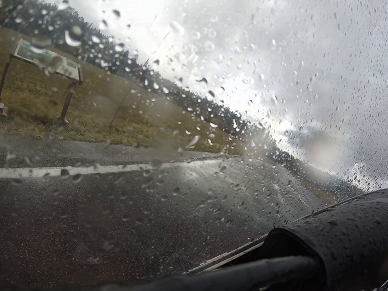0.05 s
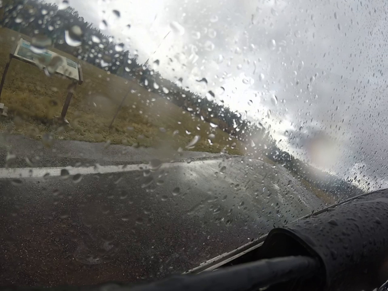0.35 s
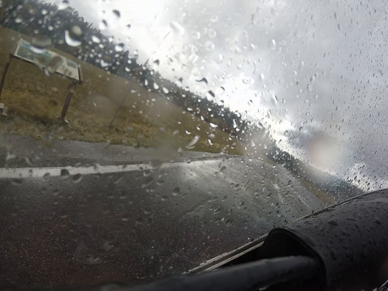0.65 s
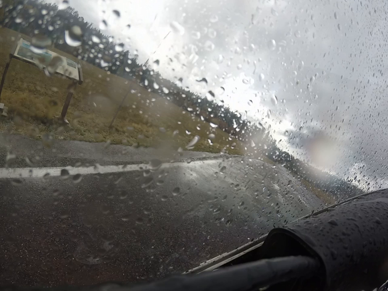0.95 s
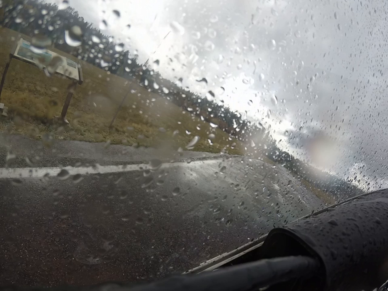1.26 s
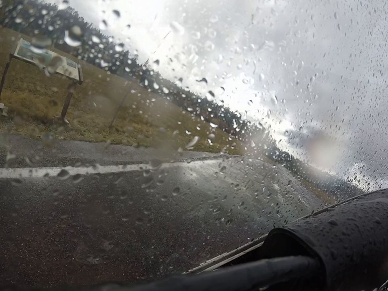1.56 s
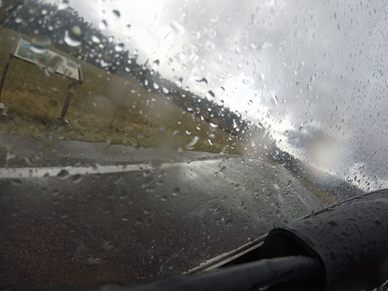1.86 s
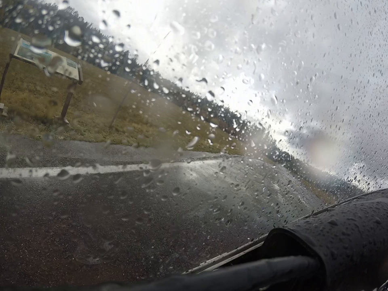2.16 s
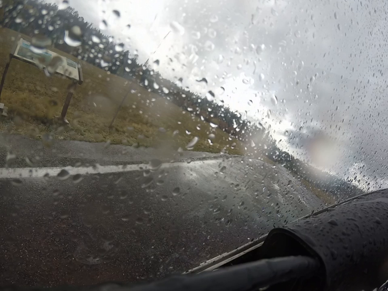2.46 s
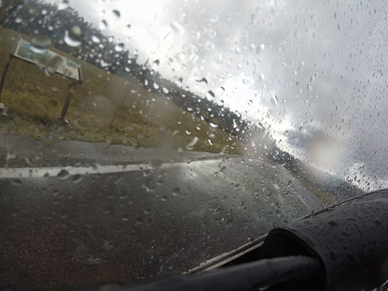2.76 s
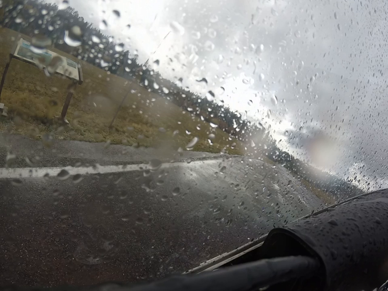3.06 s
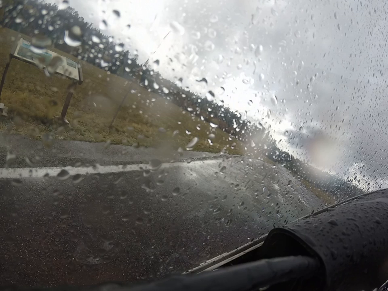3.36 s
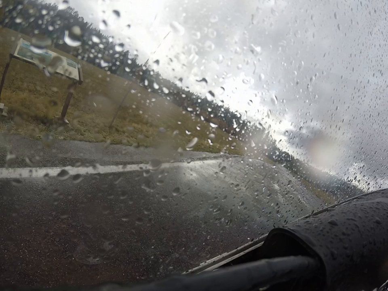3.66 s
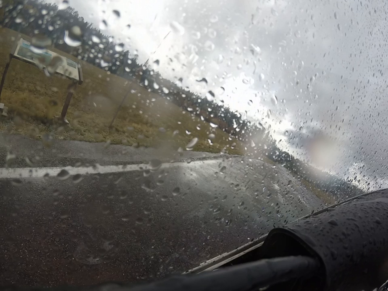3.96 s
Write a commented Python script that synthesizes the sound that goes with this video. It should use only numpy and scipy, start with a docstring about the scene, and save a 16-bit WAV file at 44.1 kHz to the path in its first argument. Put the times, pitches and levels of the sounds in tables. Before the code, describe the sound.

Raindrops and sleet tick unevenly on a parked car's windscreen, close to a microphone inside. One heavy drop thuds, then a pellet pings on thin metal. Faint drizzle, low wind and distant rain hiss continue underneath.

```python
"""Raindrops and sleet pellets tick on a parked car's windscreen, close to one microphone in the cabin.
Each hit rings the same short modes of glass and trim, in a balance set by where and how hard it lands,
and bursts in a tiny splash. One heavy drop thuds in a panel; one hard pellet pings on thin metal.
Fine drizzle patters underneath. Further off are low wind and the hiss of distant rain,
with a faint hum and a thin sizzle passing midway."""
import sys
import numpy as np
from scipy import signal
from scipy.fft import rfft, irfft
from scipy.io import wavfile
from scipy.ndimage import uniform_filter1d

SR = 44100
rng = np.random.default_rng(int(sys.argv[2]) if len(sys.argv) > 2 else 0)


def wrap_up_sound(samples):
    """Save the sound to the file named by the first command line argument, as 16-bit audio."""
    columns = np.atleast_2d(samples).T
    # keep every value between -1 and 1, then stretch to whole-number steps
    tamed = np.clip(columns, -1, 1)
    steps = np.round(tamed * 32767).astype(np.int16)
    wavfile.write(sys.argv[1], SR, steps)


N = 176400
TICK_SAMPLES = 2048
TICK_HZ = np.arange(TICK_SAMPLES // 2 + 1) * SR / TICK_SAMPLES
SCREEN_LOW_HZ, SCREEN_TOP_HZ = 737, 12000  # the stiff screen radiates between these


def undb(db):
    """Decibels to gain."""
    return 10 ** (np.asarray(db) / 20)


def clock(seconds):
    """Sample times of a short sound."""
    return np.arange(int(seconds * SR)) / SR


def fade(t, t60):
    """Exponential decay, 60 dB down after t60 seconds."""
    return np.exp(-np.log(1000) * t / max(t60, 1e-4))


def unit(x):
    """Scale to an energy of one."""
    return x / np.sqrt(np.sum(x ** 2) + 1e-30)


def filt(x, hz, kind, order=2):
    """Causal Butterworth filter."""
    return signal.sosfilt(signal.butter(order, hz, kind, fs=SR, output="sos"), x)


def drift(rate_hz):
    """Smooth random drift with a spread of one."""
    step = int(SR / rate_hz)
    curve = uniform_filter1d(np.repeat(rng.standard_normal(N // step + 1), step), step)[:N]
    return curve / curve.std()


def add(out, start_s, x):
    """Mix a sound in at a time."""
    i = int(start_s * SR)
    out[i:i + len(x)] += x[:max(N - i, 0)]


def ring(modes, t):
    """Decaying sines struck together."""
    return sum(undb(db) * np.sin(2 * np.pi * hz * t) * fade(t, t60) for hz, db, t60 in modes)


# Spectrum of the distant weather, from inside the car: frequency_hz, relative_db
WEATHER_SPECTRUM = [(12, -26), (20, -3), (53, 0.5), (107, 0), (337, -4.5), (434, -7), (780, -9.5),
                    (1190, -10), (1330, -15), (1610, -11.5), (2530, -15.5), (10200, -30), (13500, -35),
                    (16000, -41)]


def wind_and_far_rain(level_db=-61.5, flicker_db=0.9, steady_hz=2000):
    """Low rumble and far hiss; each octave flickers on its own, less so above steady_hz."""
    hz = np.maximum(np.arange(N // 2 + 1) * SR / N, 1)
    point_hz, point_db = np.array(WEATHER_SPECTRUM).T
    spectrum = rfft(rng.standard_normal(N)) * undb(np.interp(np.log(hz), np.log(point_hz), point_db))
    octave = np.maximum(np.log2(hz).astype(int), 5)
    out = np.zeros(N)
    for k in np.unique(octave):
        depth_db = flicker_db / np.hypot(1, 2. ** k / steady_hz)
        out += irfft(spectrum * (octave == k), N) * undb(depth_db * drift(rate_hz=23.01))
    return out / out.std() * undb(level_db)


# Bounds of the screen's six bands (knock, ring, clack, tick, snap, crack): edge_hz
BAND_EDGES_HZ = [600, 1080, 1400, 2300, 3600, 6200, 15000]


def band_of(hz):
    """Which of the six bands a frequency falls in."""
    return np.searchsorted(BAND_EDGES_HZ[1:-1], hz)


def resonance(hz, t60):
    """Power response of one damped mode, summing to one."""
    half_width_hz = np.log(1000) / (2 * np.pi * t60)
    power = 1 / ((TICK_HZ ** 2 - hz ** 2) ** 2 + (2 * half_width_hz * TICK_HZ) ** 2)
    return power / power.sum()


def bending_wave(power, low_delay_s=0.000686, half_delay_hz=2980):
    """Ringing of a plate with this power response; the lows travel slower and arrive late."""
    cepstrum = irfft(np.log(power + 1e-20) / 2)
    cepstrum[1:TICK_SAMPLES // 2] *= 2  # minimum phase: nothing sounds before the hit
    cepstrum[TICK_SAMPLES // 2 + 1:] = 0
    phase_lag = 2 * np.pi * low_delay_s * half_delay_hz * np.arctan(TICK_HZ / half_delay_hz)
    fade_out = np.minimum(np.linspace(4, 0, TICK_SAMPLES), 1) ** 2
    return irfft(np.exp(rfft(cepstrum) - 1j * phase_lag)) * fade_out


# Modes of the windscreen and trim, close to the microphone: pitch_hz, relative_db, t60_s
SCREEN_MODES = [(703, -6, 0.041), (979, 3, 0.035), (1220, -2, 0.037), (1593, 4.5, 0.013), (1760, -6, 0.016),
                (2090, 3, 0.01), (2448, 3, 0.017), (2640, 6, 0.015), (3315, 0.5, 0.013), (4320, -9, 0.01),
                (4910, 4, 0.0057), (5700, -6, 0.0049), (7000, -6, 0.0041), (7950, -10, 0.0047),
                (9600, -24.5, .006), (11700, -17.5, 0.0026)]


def screen_ring(note_hz, cycles, echo_ms, levels_db, note_boost_db=9.5, echo_gain=0.41):
    """The screen's modes and the struck spot's own note ring, combed by an echo from the edge."""
    scatter = rng.standard_normal((len(SCREEN_MODES), 2))
    power = sum(undb(db + 2 * louder) ** 2 * resonance(hz * (1 + 0.012 * sharper), t60)
                for (hz, db, t60), (sharper, louder) in zip(SCREEN_MODES, scatter))
    band = band_of(TICK_HZ)
    note_power = undb(note_boost_db) ** 2 * power[band == band_of(note_hz)].sum()
    power += note_power * resonance(note_hz, t60=cycles / note_hz)
    edge_comb = np.abs(1 + echo_gain * np.exp(-2j * np.pi * TICK_HZ * echo_ms / 1000)) ** 2
    low_cut = 1 / (1 + (SCREEN_LOW_HZ / (TICK_HZ + 1)) ** 10) + undb(-19) ** 2  # some bass leaks
    high_cut = 1 / (1 + (TICK_HZ / SCREEN_TOP_HZ) ** 6)
    power *= edge_comb * low_cut * high_cut
    centres_hz = np.sqrt(np.multiply(BAND_EDGES_HZ[:-1], BAND_EDGES_HZ[1:]))
    for _ in range(4):  # ease each band towards its level
        log_gain = np.log(undb(levels_db) ** 2 / np.bincount(band, power))
        power *= np.exp(np.interp(TICK_HZ, centres_hz, log_gain))
    return unit(bending_wave(power)) * np.sqrt(power.sum())


# Splash on the glass against the ringing, per band from knock to crack: relative_db
SPLASH_BANDS_DB = [-20, -20, -8.5, -16.5, -3.5, -17.5]


def splash(levels_db, attack_s=0.00023, t60_s=0.014, top_hz=7550):
    """A few milliseconds of noise as the drop bursts; the water cushions its start."""
    noise = rfft(rng.standard_normal(TICK_SAMPLES))
    noise *= (TICK_HZ > SCREEN_LOW_HZ) / np.sqrt(1 + (TICK_HZ / top_hz) ** 6)
    t, band = np.arange(TICK_SAMPLES) / SR, band_of(TICK_HZ)
    envelope = fade(t, t60_s) * (1 - np.exp(-(t / attack_s) ** 2))
    burst = sum(undb(db + SPLASH_BANDS_DB[k]) * unit(irfft(noise * (band == k)) * envelope)
                for k, db in enumerate(levels_db))
    return filt(burst, SCREEN_LOW_HZ, "high")


def impact(note_hz, cycles, echo_ms, levels_db):
    """One drop or pellet rings the screen and splashes; levels are its energy spread over 10 ms."""
    return (screen_ring(note_hz, cycles, echo_ms, levels_db) + splash(levels_db)) * np.sqrt(.01 * SR)


# A typical drizzle drop on the nearby glass, per band from knock to crack: level_db
DRIZZLE_BANDS_DB = [-79.5, -72, -78.5, -83, -83, -93.5]


def drizzle(drops_per_s=30, low_hz=890, high_hz=2750, size_db=2, colour_db=4):
    """Tiny drops land at random on the screen, each with its own note, size and colour."""
    out = np.zeros(N)
    drops = rng.random((int(drops_per_s * N / SR), 4 + len(DRIZZLE_BANDS_DB)))
    for when, spot, edge_distance, size, *colour in drops:
        levels_db = np.array(DRIZZLE_BANDS_DB) + size_db * (2 * size - 1)
        levels_db += colour_db * (2 * np.array(colour) - 1)
        note_hz = low_hz * (high_hz / low_hz) ** spot
        echo_ms = 0.81 + edge_distance * (2.18 - 0.81)
        add(out, when * N / SR, impact(note_hz, cycles=24, echo_ms=echo_ms, levels_db=levels_db))
    return out


# Drops and pellets on the windscreen, close to the microphone: start_s, pitch_hz, decay_cycles,
# edge_echo_ms, knock_db, ring_db, clack_db, tick_db, snap_db, crack_db
SCREEN_HITS = [(0.1736, 1535, 79, 1.07, -68, -59, -60, -75, -82, -90),
               (0.503, 2100, 48, 1.15, -65.5, -73, -62, -69, -85, -90),
               (0.5643, 1085, 48, 1.9, -62.5, -62.5, -67, -79, -80, -90),
               (0.5694, 2500, 38, 1.2, -72, -72, -71, -65.5, -77, -90),
               (0.6583, 1190, 22, 0.93, -54.5, -52.5, -56.5, -56.5, -67, -84),
               (0.7662, 2950, 25, 1, -75, -78, -70, -67, -84, -90),
               (1.2243, 1220, 45, 1.6, -44, -41, -33, -33, -40.5, -46.5),
               (1.2873, 970, 20, 1, -67, -66, -68, -69.5, -84, -92),
               (1.4148, 2040, 20, 1, -74, -59, -58, -68, -72, -88),
               (1.4196, 2640, 20, 1.3, -63, -65, -62, -60, -66.5, -69),
               (1.4264, 1750, 7.3, 0.64, -53, -58, -42, -57, -64.5, -70),
               (1.4798, 1750, 25, 1.1, -80, -73, -69, -71, -82, -90),
               (1.7742, 7800, 30, 0.82, -85, -85, -78, -80, -76, -73.5),
               (1.97, 1220, 90, 1.6, -57, -48, -51, -55.5, -69, -87),
               (1.9747, 2140, 30, 1.1, -64, -59, -57, -66, -76, -88),
               (2.0034, 2360, 25, 0.97, -50.5, -55, -51.5, -52, -66.5, -81),
               (2.0088, 950, 45, 1.06, -48.5, -69, -55.5, -62.5, -75, -89),
               (2.2349, 1190, 34, 1.75, -67, -62, -68, -70, -77, -88),
               (2.3966, 1160, 22, 0.51, -55, -42.5, -74, -54, -77, -90),
               (2.4034, 2090, 13, 1.9, -45.5, -40, -22.5, -23.5, -35.5, -37.5),
               (2.477, 2900, 40, 0.8, -76, -63, -72, -60.5, -83, -91),
               (2.562, 2460, 30, 1.17, -64, -69, -65, -59, -83, -90),
               (2.7251, 1494, 19, 0.74, -49.5, -47.5, -40, -46.5, -49.5, -53.5),
               (2.8651, 1116, 47, 0.79, -64, -60, -62, -63, -81, -88),
               (2.8756, 4400, 14, 0.67, -69, -63, -61, -60, -61, -83),
               (3.0223, 3550, 18, 0.78, -55, -38.5, -44.5, -41.5, -50, -67),
               (3.0304, 1180, 25, 0.99, -44.5, -40, -55, -46.5, -50, -51.5),
               (3.039, 1220, 23, 0.68, -50, -40.5, -43.5, -55.5, -65, -67),
               (3.148, 739, 22, 1.45, -53, -80, -52.5, -59.5, -81, -90),
               (3.2158, 1076, 26, 0.99, -49, -58, -54.5, -65, -67.5, -71.5),
               (3.2188, 915, 50, 0.97, -51.5, -56.5, -59.5, -63, -70.5, -89),
               (3.2329, 920, 20, 1.1, -59, -57, -68, -64, -83, -90),
               (3.2976, 1220, 20, 1.6, -73, -64, -71, -72, -86, -91),
               (3.4119, 2894, 20, 0.69, -59, -63, -52.5, -52, -66, -68),
               (3.4219, 2320, 20, 1.07, -66, -55.5, -51.5, -56, -68, -84),
               (3.426, 1220, 76, 1.54, -57, -47, -55, -62, -76, -90),
               (3.7396, 1110, 22, 0.83, -59.5, -59, -66, -80, -85, -90),
               (3.7613, 2410, 96, 1.25, -66, -69, -68, -59, -88, -91),
               (3.9232, 1220, 20, 0.84, -59, -59, -63, -61, -73, -90),
               (3.9267, 1076, 50, 1.1, -50, -55, -57, -66, -74, -85),
               (3.9345, 1060, 20, 1.9, -64, -57, -62, -72, -85, -89),
               (3.9433, 6960, 40, 1.6, -44, -33.5, -32.5, -32.5, -42.5, -42.5),
               (3.9907, 1250, 17, 0.74, -29.5, -16, -18, -16, -36, -42.5)]


def rain_and_sleet():
    """Larger drops and pellets strike the screen as distinct ticks."""
    out = np.zeros(N)
    for start_s, note_hz, cycles, echo_ms, *levels_db in SCREEN_HITS:
        add(out, start_s, impact(note_hz, cycles, echo_ms, levels_db))
    return out


def cabin(x, tail_db=-24.5, t60_s=0.045, top_hz=2570):
    """The small upholstered cabin adds a short dull tail."""
    t = clock(.2)
    dull_noise = filt(rng.standard_normal(len(t)), top_hz, "low")
    tail = dull_noise * fade(t, t60_s) * (1 - fade(t, 0.0037))
    return x + undb(tail_db) * signal.fftconvolve(x, unit(tail))[:N]


# Modes of a body panel, heard from the cabin: pitch_hz, relative_db, t60_s
PANEL_MODES = [(323, -1.5, 0.069), (480, -1.5, .02), (695, -7, 0.024)]


def panel_thud(gain_db=-43):
    """A heavy drop sets off the panel's low, short modes."""
    return undb(gain_db) * ring(PANEL_MODES, clock(.3))


# A low hum, then a sizzle in three bands, in the background:
# start_s, length_s, pitch_hz, width_hz, level_db
HUM_AND_SIZZLE_BANDS = [(1.72, 0.14, 305, 50, -68), (2.045, 0.125, 8100, 450, -81.5),
                        (2.06, 0.1, 9300, 350, -86), (2.05, 0.11, 7150, 600, -83)]


def hum_and_sizzle():
    """Narrow bands of noise, heard as faint wavering tones that rise and fade once."""
    out = np.zeros(N)
    for start_s, length_s, hz, width_hz, db in HUM_AND_SIZZLE_BANDS:
        t = clock(length_s)
        noise = filt(rng.standard_normal(N), [hz - width_hz / 2, hz + width_hz / 2], "band")[-len(t):]
        arch = np.sqrt(np.sin(np.pi * t / length_s))
        add(out, start_s, undb(db) * noise / noise.std() * arch)
    return out


# Modes of a thin piece of metal on the car: pitch_hz, relative_db, t60_s
METAL_MODES = [(986, 3, 0.045), (1843, -4, 0.2), (2891, 0, 0.12), (3130, -15, 0.18), (3300, 11, 0.022)]


def metal_ping(gain_db=-42):
    """A hard pellet sets thin metal ringing; its lowest and highest modes die first."""
    return undb(gain_db) * filt(ring(METAL_MODES, clock(.3)), SCREEN_LOW_HZ, "high", order=4)


def scene():
    """One spot in the car: close hits with the cabin's tail, over drizzle and distant weather."""
    background = wind_and_far_rain() + hum_and_sizzle()
    hits = rain_and_sleet()
    add(hits, start_s=1.2244, x=panel_thud())
    add(hits, start_s=2.4037, x=metal_ping())
    return (background + cabin(hits) + drizzle())[None]


def record(dry, top_hz=15800):
    """The recorder clips at full scale and cuts the top."""
    low_pass = signal.ellip(8, .2, 70, top_hz, fs=SR, output="sos")
    return signal.sosfilt(low_pass, np.clip(dry, -1, 1))


dry = scene()
out = record(dry)
wrap_up_sound(out)
```